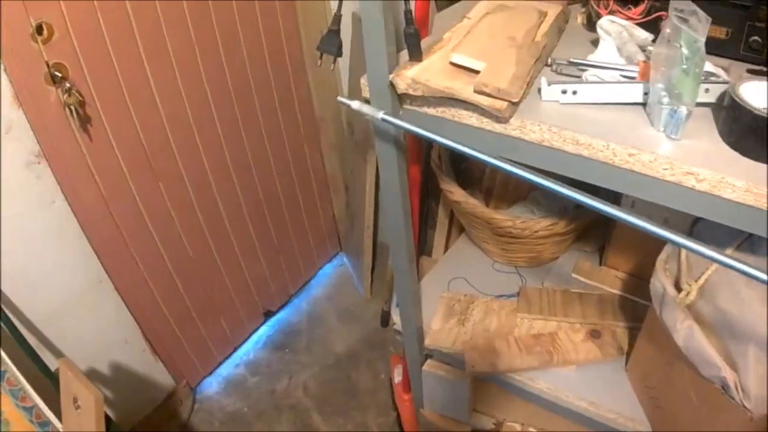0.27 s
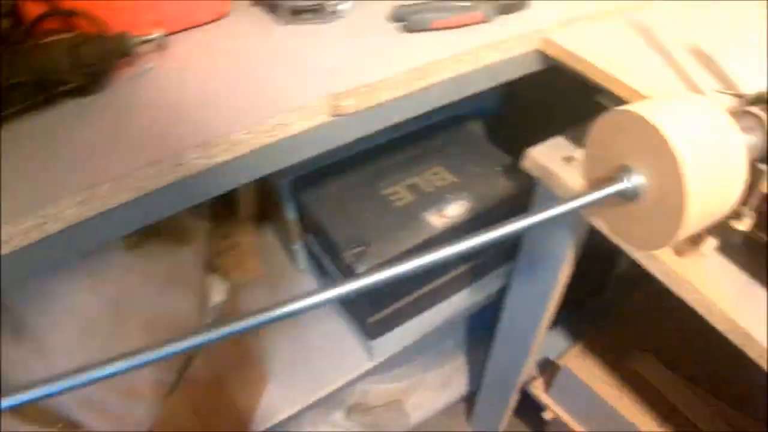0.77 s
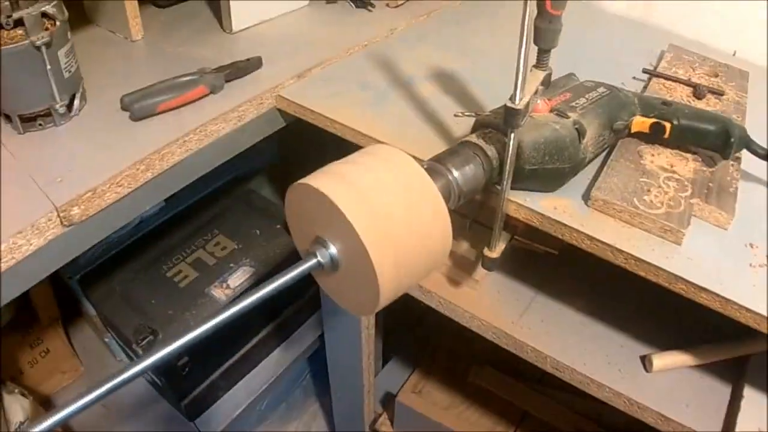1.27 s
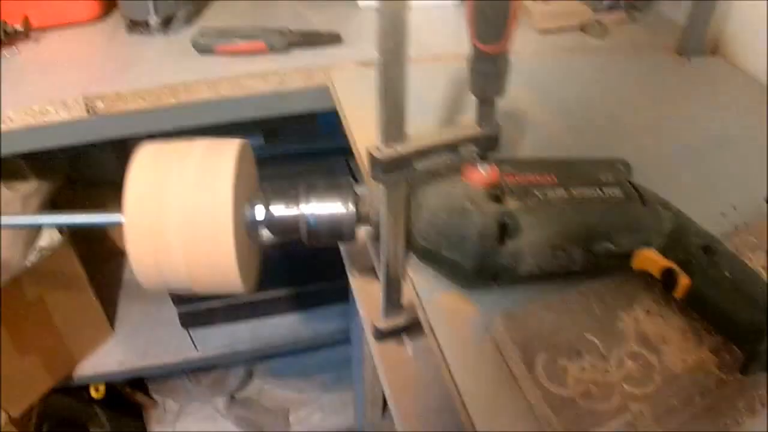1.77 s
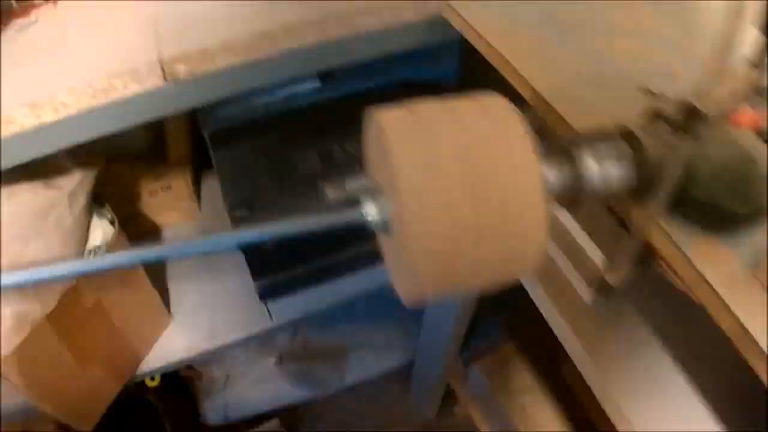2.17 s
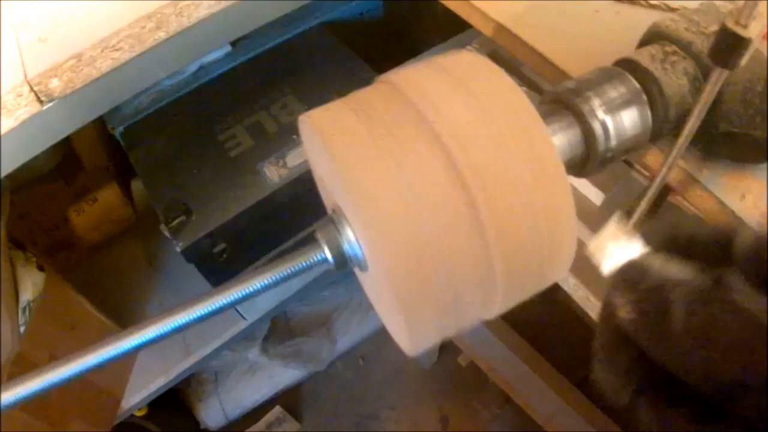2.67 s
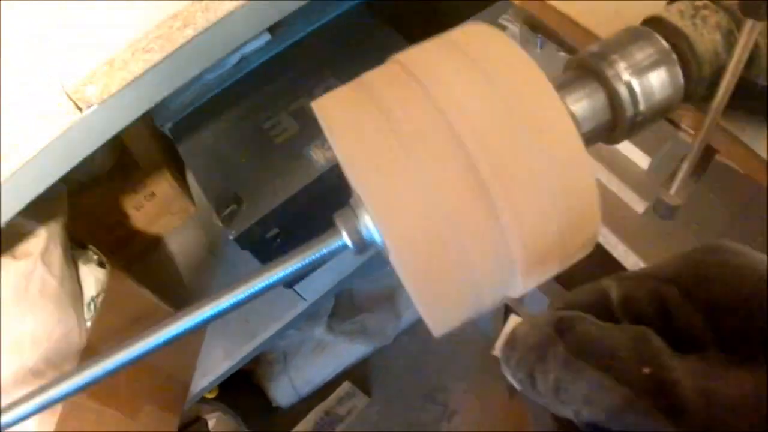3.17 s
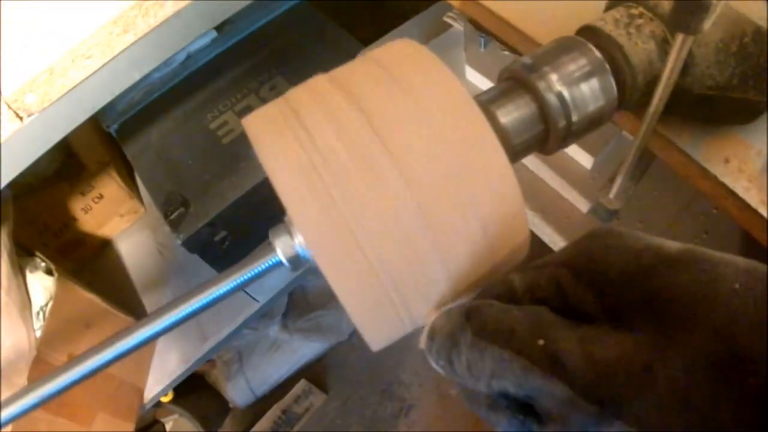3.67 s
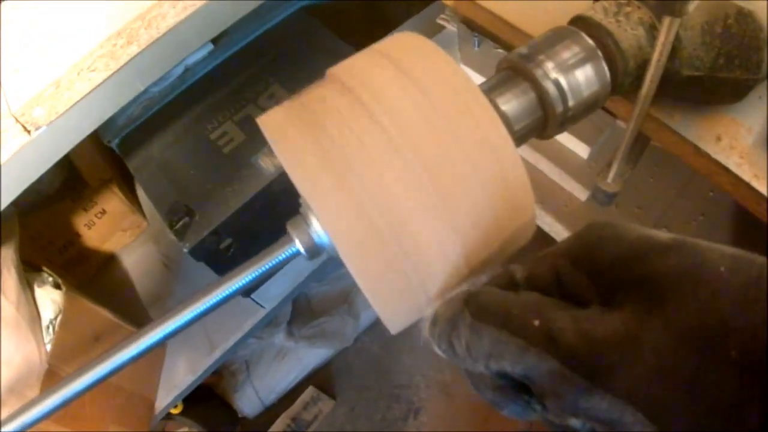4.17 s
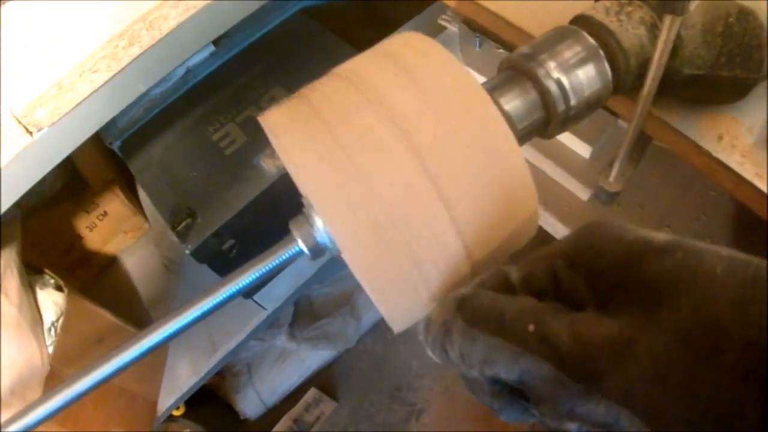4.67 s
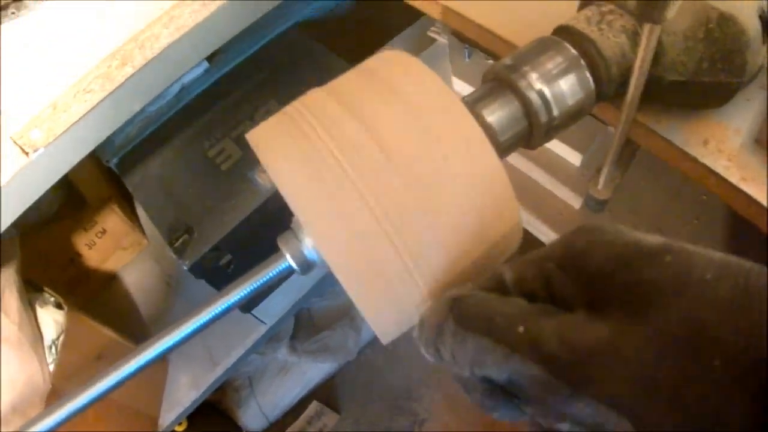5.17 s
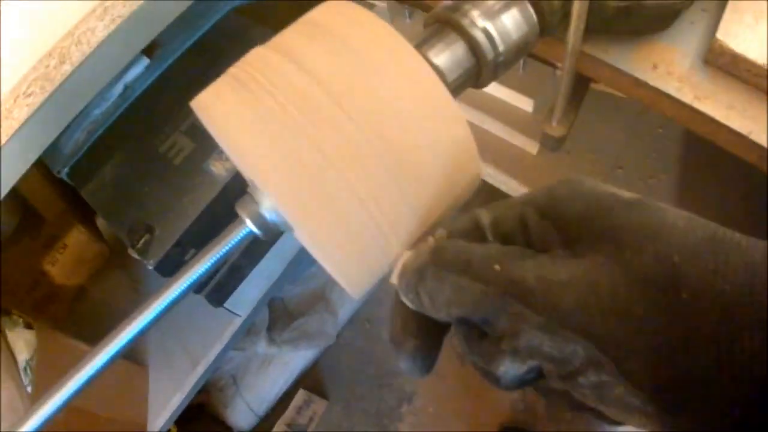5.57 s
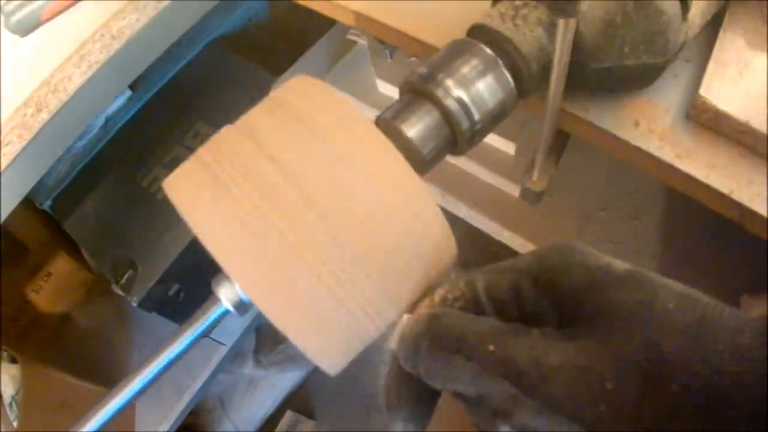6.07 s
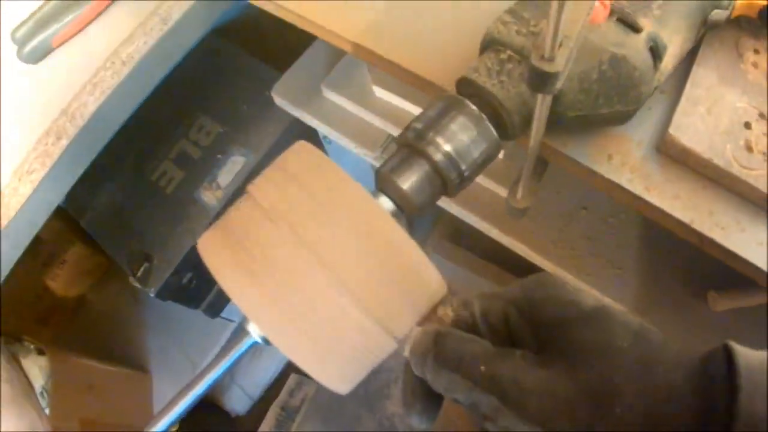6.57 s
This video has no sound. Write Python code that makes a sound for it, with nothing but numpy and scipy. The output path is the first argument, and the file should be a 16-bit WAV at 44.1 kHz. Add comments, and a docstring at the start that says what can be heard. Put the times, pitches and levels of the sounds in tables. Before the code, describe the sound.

An electric drill clamped to a workshop bench spins a wooden block with a bright, rattling whir and a high gear whine. It grows slightly louder as the microphone moves in close, with a couple of brief ticks from the shaft. About halfway through, sandpaper is pressed to the wood, adding a steady hiss and a fast, gritty rasp, and the whine sinks as the drill slows under the load.

```python
"""An electric drill clamped to a bench spins a wooden blank; the microphone swings from the door up to it.
Brush and gear noise excites the housing's resonances, over a tooth-mesh whine, a mains buzz, the rush
of the fan and three bursts of shaft chatter. Then sandpaper is pressed on the wood: friction makes it
hiss, rasp once a turn and squeal thinly, while the speed and the gear whine fall under the load.
Now and then the bass and top treble dip for an instant."""
import sys
import numpy as np
from scipy import signal
from scipy.fft import rfft, irfft
from scipy.io import wavfile
from scipy.ndimage import uniform_filter1d, minimum_filter1d

SR = 44100
rng = np.random.default_rng(int(sys.argv[2]) if len(sys.argv) > 2 else 0)


def inscribe(sig):
    """Save sig as 16-bit PCM at rate SR to the path in sys.argv[1].

    A 1-D sig is mono; a 2-D sig holds one channel per row.
    Samples are clipped to [-1, 1] before scaling.
    """
    pcm = np.round(np.clip(np.atleast_2d(sig).T, -1, 1) * 32767)
    wavfile.write(sys.argv[1], SR, pcm.astype(np.int16))


N = 300223
T = np.arange(N) / SR
HZ = np.fft.rfftfreq(N, 1 / SR)
MAINS_HZ, GEAR_TEETH = 49.96, 37
# microphone path: (time [s], place [0 toward the door, 1 beside the drill, 2 facing the blank],
# distance [m])
MIC_PATH = [(0, 0.16, 1.05), (.62, 0, .95), (.95, 0.81, .52), (1.55, 0.71, 0.47), (1.85, 1.2, 0.27),
            (2.3, 0.94, 0.32), (2.5, 2, 0.27)]


def rattle(load, gain_db=2.0, chop=0.12, shade_db=-2, shade_hz=4200):
    """Resonance: brush and gear noise rings the housing, which radiates differently in each direction."""
    # excitation spectrum: (frequency [Hz], relative level [dB])
    excitation = [(30, -107), (1000, -25.5), (1500, -15), (2100, -7), (2700, -4.5), (3400, 1.5), (4400, -2),
                  (5650, 0), (6100, -6.5), (7000, -15.5), (8000, -20.5), (10000, -34), (12300, -32),
                  (15500, -39.5)]
    # housing modes: (frequency [Hz], width [Hz], lift at place 0 [dB], at 1 [dB], at 2 [dB])
    modes = [(1390, 245, 1, -1.5, 7), (1906, 106, -3, 1, 6), (2641, 70, 9, 10.5, 8), (2840, 72, 7, 3, -3),
             (2900, 180, -1.5, 4, 1.5), (3080, 116, 12.5, -2.5, 4), (3280, 115, 2, 9.5, -3.5),
             (3440, 82, -3, 4, 4.5), (3887, 78, 4.5, -0.5, -10.5), (3972, 55, 10, 10, 6.5),
             (4300, 104, 0, 3, 5.5), (4600, 120, 1, -4, 3), (4670, 130, 6, 9, 6.5),
             (5307, 79, -18, -10, -2.5), (5354, 34, 13, 12, 11.5), (6030, 110, 2, 2, 4),
             (6010, 117, -0.5, -15, -10), (6140, 140, 2, 2, 4.5), (6670, 340, 1, 0.5, 5),
             (7100, 200, 0, 5, 2.5), (9200, 530, 0, 0, 5.5), (10100, 460, 10, 7.5, 10),
             (10760, 300, -1, 9.5, 6.5), (11900, 790, 2, 6, 8)]
    # directivity: (relative level at place 0 [dB], at 1 [dB], at 2 [dB])
    place_db = (-26, -23, -22.5)
    noise = rng.standard_normal(N) * (1 + chop * np.cos(2 * np.pi * 4 * MAINS_HZ * T))
    lifts = sum(np.outer(lift, 1 / (1 + (2 * (HZ - hz) / width) ** 2)) for hz, width, *lift in modes)
    heard = unit(at_place([colour(noise, spectrum(excitation) + lift) for lift in lifts]))
    # the gloved hand on the wood screens the treble
    shaded = colour(heard, shade_db * HZ ** 4 / (HZ ** 4 + shade_hz ** 4))
    unsteady_db = drift(79) + (0.16 + 0.68 * load) * drift(12)
    return (heard + load * (shaded - heard)) * amp(at_place(place_db) + gain_db + unsteady_db)


def gears(turns, load, wobble_rad=0.43, waver_db=3.0, clatter_db=-31, clatter_hz=170):
    """Tooth meshing: harmonics of the tooth rate whine, and load adds a band of clatter."""
    # mesh tones: (multiple of the tooth rate, level running free [dB], level under load [dB])
    whine = [(1, -62, -49), (2, -39, -36.5), (6, -64, -70)]
    mesh = 2 * np.pi * GEAR_TEETH * turns
    runout = wobble_rad * np.sin(2 * np.pi * turns)  # an off-centre wheel gives each line sidebands
    out = amp(clatter_db) * load * narrowband(2 * mesh, clatter_hz)
    for multiple, free_db, loaded_db in whine:
        db = free_db + load * (loaded_db - free_db) + waver_db * drift(14)
        phase = multiple * (mesh + runout) + drift(30)
        out += np.sqrt(2) * np.sin(phase) * amp(db)
    return out


def mains_buzz(gain_db=-1.5, waver_db=2.7, smear_rad=0.57):
    """Forced vibration: chopped mains current shakes the motor iron at pitches independent of speed."""
    # buzz lines: (multiple of twice the mains frequency, relative level at place 0 [dB],
    # at 1 [dB], at 2 [dB])
    harmonics = [(6, -67, -60, -68), (12, -62, -59, -55), (16, -55, -57, -51), (18, -48, -38, -37),
                 (20, -49, -48, -43), (22, -52, -40, -43), (24, -48, -47, -43), (26, -52, -42, -39),
                 (30, -47, -49, -42), (32, -50, -47, -42), (34, -50, -40, -48), (36, -49, -40, -52),
                 (38, -50, -41, -43), (40, -48, -44, -45), (54, -45, -42, -38), (56, -41, -46, -43)]
    out = np.zeros(N)
    for multiple, *db in harmonics:
        phase = 2 * np.pi * (multiple * 2 * MAINS_HZ * T + rng.random()) + smear_rad * drift(15)
        out += np.sqrt(2) * np.sin(phase) * amp(at_place(db) + gain_db + waver_db * drift(5.4))
    return out


def hand(sag, touch_s=3.19, bite_s=3.39, push_width_s=0.042, db_per_sag=0.43, flat_sag=13):
    """Friction brakes the spindle, so lost speed gives the pressure (dB) and the rasp's depth (0-1)."""
    # the hand pushes or eases for a moment: (time [s], pressure change [dB])
    pushes = [(3.72, 1.5), (4.81, 5.5), (5.23, -5), (6.0, 4.5), (6.78, 5.5)]
    pushes_db = sum(db * np.exp(-((T - s) / push_width_s) ** 2) for s, db in pushes)
    contact_db = 20 * np.log10(ramp(touch_s, length_s=0.21) + 1e-4)
    press_db = -1.5 + db_per_sag * sag + pushes_db + contact_db
    # at flat_sag the paper would hug the blank so hard that the once-a-turn rasp vanishes
    depth = ramp(bite_s, length_s=0.24) * np.clip(1 - (sag / flat_sag) ** 2, 0, 1)
    return press_db, depth


def sandpaper(turns, press_db, depth, hiss_db=-29, grit_db=-42, chip_db=-51, rasp_db=17, throb=0.37):
    """Sliding friction: paper hisses, and its grits snap hardest as the blank's high side comes round."""
    # spectra of the hiss and of the snaps' dull part: (frequency [Hz], relative level [dB])
    hiss_shape = [(500, -54), (1000, -25), (1450, -12), (2150, -12), (2700, 2), (3300, 1), (3800, -35),
                  (6000, -3), (9000, -93)]
    snap_shape = [(25, -64), (130, -26.5), (500, -3), (1500, 2), (4000, -2.5), (7000, 9), (8500, -5.5),
                  (12000, -40), (15500, -18)]
    high_side = depth * np.cos(2 * np.pi * turns)
    grip = amp(press_db + 2.5 * drift(36))  # the paper shakes in the fingers
    hiss = unit(colour(rng.standard_normal(N), spectrum(hiss_shape))) * (1 + throb * high_side) * grip
    # a deeper rasp gathers the snaps into a shorter part of the turn
    bite = amp(press_db + rasp_db * (high_side - .5 * depth))
    snaps = unit(colour(clicks(per_s=4000, spread_db=5) * bite, spectrum(snap_shape)))
    return amp(hiss_db) * hiss + amp(grit_db) * snaps + amp(chip_db) * chips(bite * depth)


def chips(force, low_hz=7600, high_hz=11950, pitches=8, size=44):
    """Fracture: grits tear single fibres, giving millisecond ticks at several pitches."""
    out = np.zeros(N)
    for hz in np.linspace(low_hz, high_hz, pitches):
        tick = np.hanning(size) * np.sin(2 * np.pi * hz * T[:size])
        out += np.convolve(clicks(per_s=400, spread_db=4) * force, tick, "same")
    return unit(out)


def squeal(sag, free_hz=9500, hz_per_sag=-86, level_db=-51, waver_db=3):
    """Stick-slip: the paper's edge catches and releases on the wood, lower as the wood slows."""
    phase = 2 * np.pi * np.cumsum(free_hz + hz_per_sag * sag) / SR
    swell = np.sin(np.pi * ramp(start_s=5.56, length_s=1.04))
    return swell * amp(level_db + waver_db * drift(8)) * narrowband(phase, width_hz=70)


def shaft_chatter():
    """Transient excitation: the spinning shaft chatters in short bursts of broadband noise."""
    # bursts: (time [s], level [dB], length [s])
    bursts = [(0.907, -29.5, 0.052), (2.102, -13, .014), (5.532, -20, .02)]
    # their spectrum: (frequency [Hz], relative level [dB])
    burst_shape = [(30, -58), (150, -35), (600, -21), (1500, -5), (3300, 1), (4800, 6), (8000, -19),
                   (15000, -35)]
    envelope = sum(amp(db) * np.sin(np.pi * ramp(s, length) ** 0.82) for s, db, length in bursts)
    shape_db = spectrum(burst_shape)
    return colour(envelope * rng.standard_normal(N), shape_db) / np.sqrt(np.mean(amp(shape_db) ** 2))


def fan(db_at_1m=-62, gust_db=1.3):
    """Turbulence: cooling air rushes from the vents, its sound pressure falling as 1 / distance."""
    # airflow spectrum: (frequency [Hz], relative level [dB])
    air_shape = [(25, -52), (80, -30), (160, -16.5), (300, -7), (500, 0.5), (800, 4.5), (1100, 6),
                 (1600, -6), (3000, -33)]
    _, distance = curves(MIC_PATH)
    air = unit(colour(rng.standard_normal(N), spectrum(air_shape)))
    return air * amp(db_at_1m + gust_db * drift(40)) / distance


def armature(turns, level_db=-76, waver_db=3.5, pinion_teeth=4):
    """Rotating unbalance: the motor hums faintly at its own rate of rotation."""
    phase = 2 * np.pi * turns * GEAR_TEETH / pinion_teeth
    return np.sqrt(2) * np.sin(phase) * amp(level_db + waver_db * drift(5.5))


def amp(db):
    """Decibels to amplitude ratio."""
    return 10 ** (np.asarray(db) / 20)


def unit(x):
    """Normalisation to rms 1."""
    return x / np.sqrt(np.mean(x ** 2) + 1e-20)


def ramp(start_s, length_s):
    """Linear rise from 0 to 1."""
    return np.clip((T - start_s) / length_s, 0, 1)


def curves(rows):
    """Linear interpolation of a table of times: one value a sample for each column."""
    times, *columns = np.transpose(rows)
    return [np.interp(T, times, column) for column in columns]


def at_place(values):
    """Directivity: a crossfade between the values at three places as the microphone moves."""
    place, _ = curves(MIC_PATH)
    return sum(value * np.maximum(1 - abs(place - k), 0) for k, value in enumerate(values))


def spectrum(points):
    """Spectral envelope: (Hz, dB) points joined on a log-frequency axis."""
    hz, db = np.transpose(points)
    return np.interp(np.log(HZ + 1), np.log(hz), db)


def colour(x, db):
    """Zero-phase filtering by a gain for each frequency."""
    return irfft(rfft(x) * amp(db), N)


def drift(rate_hz, size=4096):
    """Random modulation: low-pass noise of rms 1, up to about the given rate."""
    hz = np.fft.rfftfreq(size, T[-1] / size)
    slow = irfft(rfft(rng.standard_normal(size)) * np.exp(-(hz / rate_hz) ** 2), size)
    return unit(np.interp(T, np.linspace(0, T[-1], size), slow))


def narrowband(phase, width_hz):
    """Quadrature modulation: a narrow band of noise, rms 1, that follows a phase."""
    return drift(width_hz) * np.cos(phase) + drift(width_hz) * np.sin(phase)


def clicks(per_s, spread_db):
    """Shot noise: a random train of clicks, a few much larger than the rest."""
    sizes = rng.choice([-1, 1], N) * amp(spread_db * np.minimum(rng.exponential(1, N), 4))
    return sizes * (rng.random(N) < per_s / SR)


def limit(x, knee=0.31, size=89):
    """Soft limiting: the gain eases down quickly around peaks above the knee."""
    gain = np.minimum(1, knee / (abs(x) + 1e-9)) ** .65
    return x * uniform_filter1d(minimum_filter1d(gain, size), size)


def scene():
    """Superposition of drill and sandpaper, coupled through the speed of one spindle."""
    # spindle rotation: (time [s], speed [turns/s])
    spindle_speed = [(1.6, 48.45), (2.2, 47.8), (3.45, 48.4), (4.0, 44.8), (4.3, 43.8), (4.8, 43.75),
                     (5.1, 42.4), (5.45, 43.7), (5.7, 41.6), (6.2, 38.8), (6.5, 39.3), (6.8, 38.5)]
    speed, = curves(spindle_speed)
    turns = np.cumsum(speed) / SR
    sag = speed.max() - speed  # turns a second lost
    press_db, depth = hand(sag)
    load = np.minimum(amp(press_db), 1)
    drill = rattle(load) + fan() + mains_buzz() + gears(turns, load) + armature(turns)
    return (drill + sandpaper(turns, press_db, depth) + squeal(sag) + shaft_chatter())[None]


def record(dry, dip_s=0.01, low_hz=1150, high_hz=7400, edge_hz=15750):
    """Band splitting: bass and top treble dip briefly while the middle stays; then limiter and low-pass."""
    # dips outside the middle band: (time [s], depth [dB])
    dips = [(.096, 20), (.288, 14), (.501, 14), (.907, 15), (1.589, 13), (3.465, 16), (3.763, 13),
            (4.532, 15), (4.821, 66), (5.198, 15), (5.687, 17), (6.497, 12)]
    band_pass = signal.firwin(201, [low_hz, high_hz], pass_zero=False, fs=SR)
    middle = signal.oaconvolve(dry, band_pass[None], "same")
    dip_db = sum(depth * np.exp(-((T - s) / dip_s) ** 2) for s, depth in dips)
    limited = limit(middle + (dry - middle) * amp(-dip_db))
    low_pass = signal.firwin(511, edge_hz, window=("kaiser", 9), fs=SR)
    return signal.oaconvolve(limited, low_pass[None], "same")


dry = scene()
out = record(dry)
inscribe(out)
```